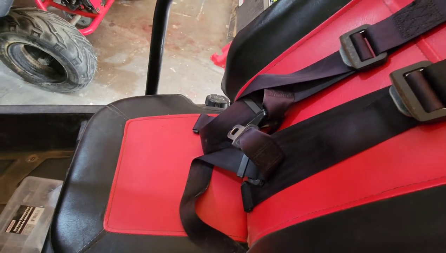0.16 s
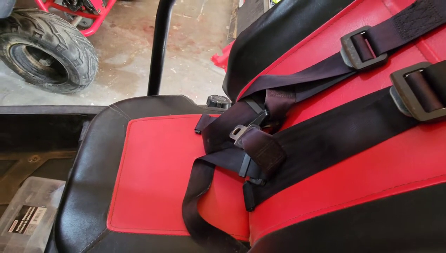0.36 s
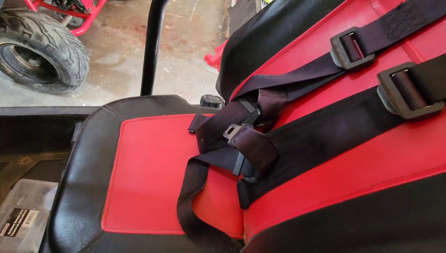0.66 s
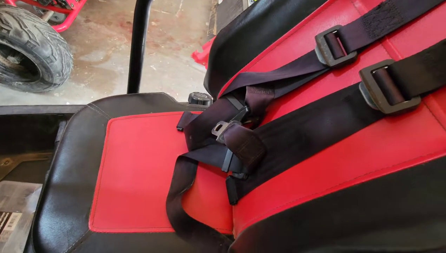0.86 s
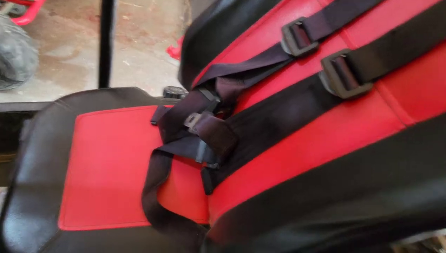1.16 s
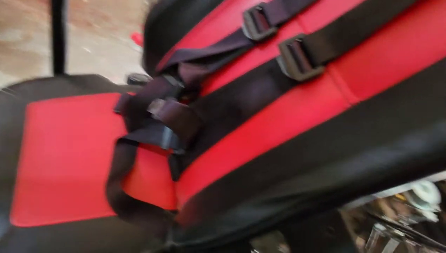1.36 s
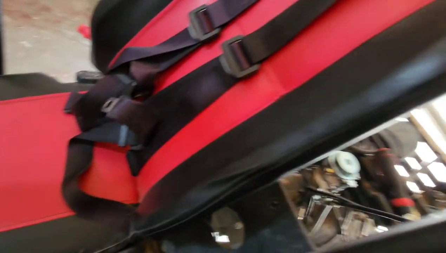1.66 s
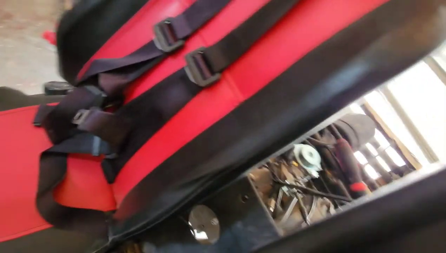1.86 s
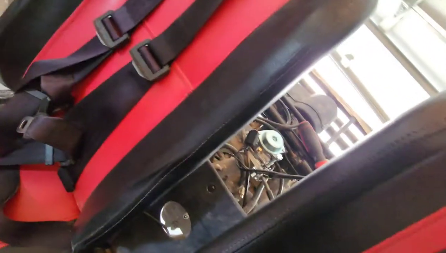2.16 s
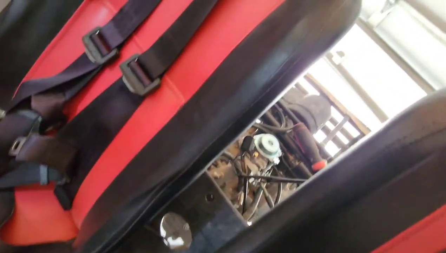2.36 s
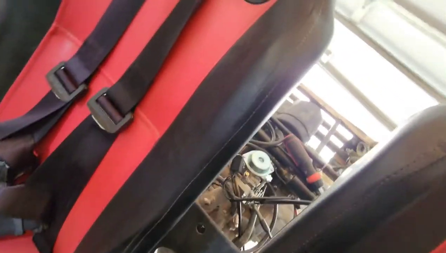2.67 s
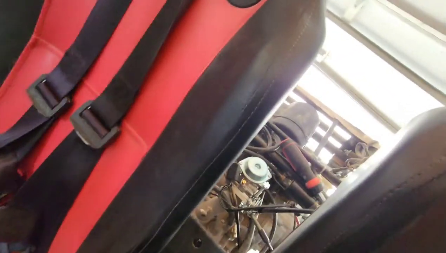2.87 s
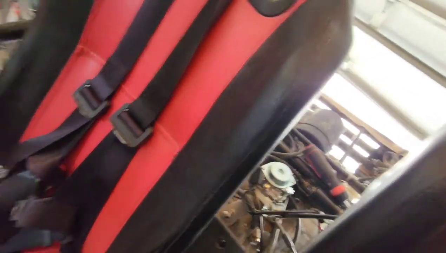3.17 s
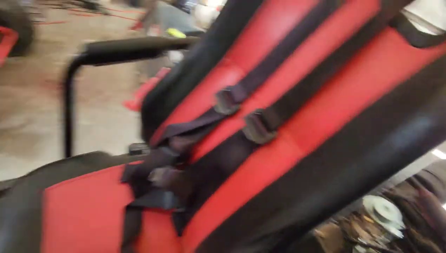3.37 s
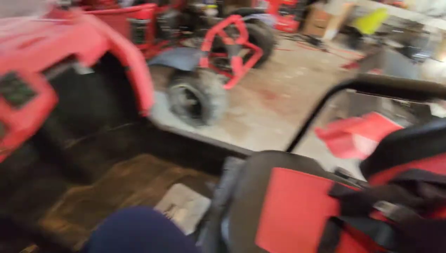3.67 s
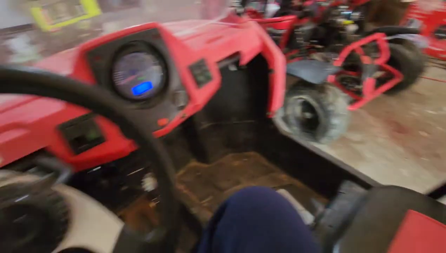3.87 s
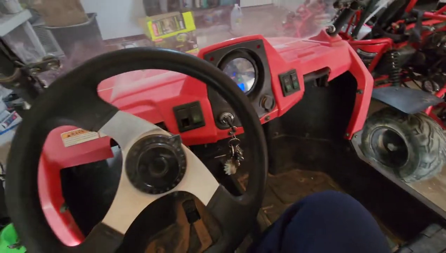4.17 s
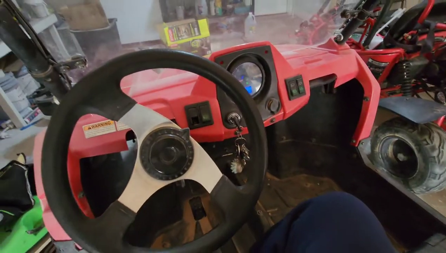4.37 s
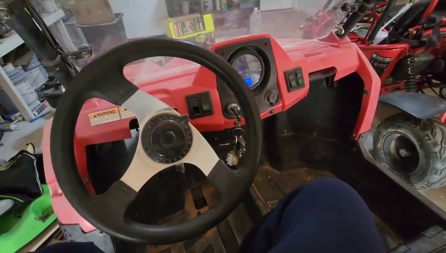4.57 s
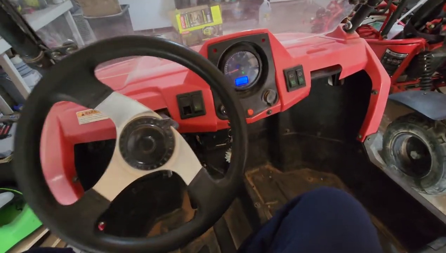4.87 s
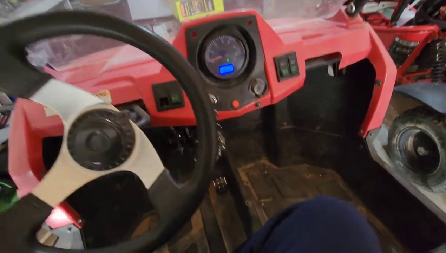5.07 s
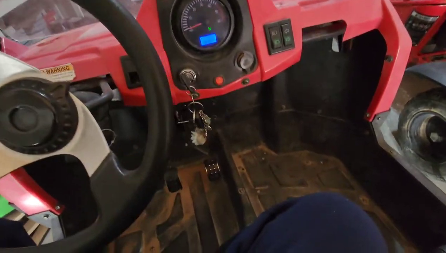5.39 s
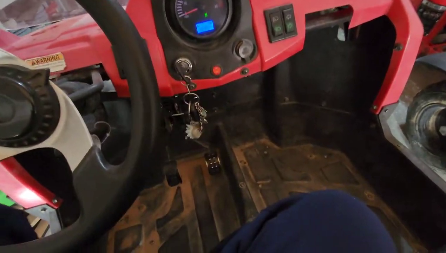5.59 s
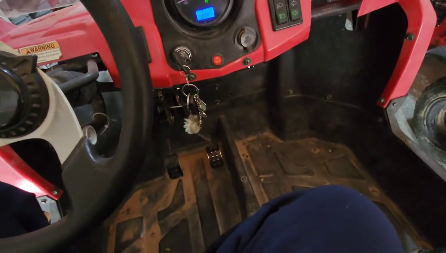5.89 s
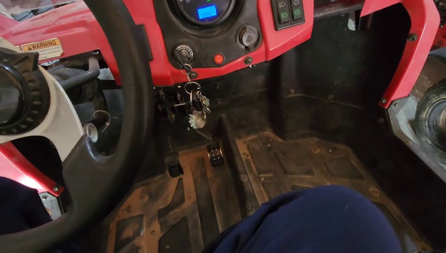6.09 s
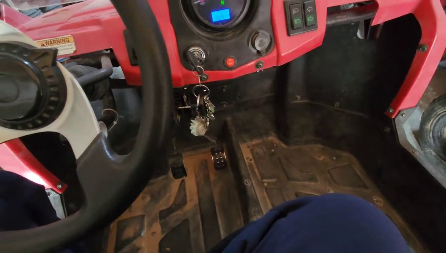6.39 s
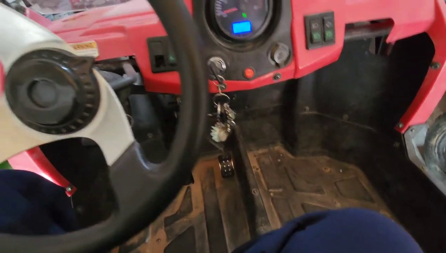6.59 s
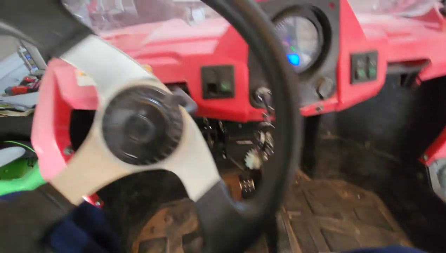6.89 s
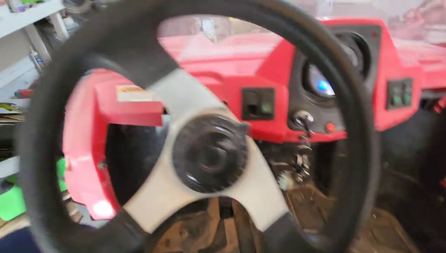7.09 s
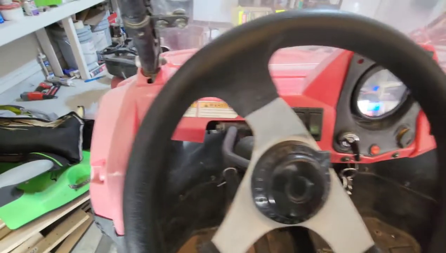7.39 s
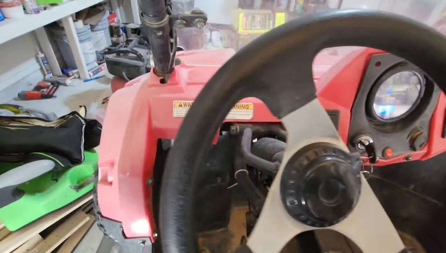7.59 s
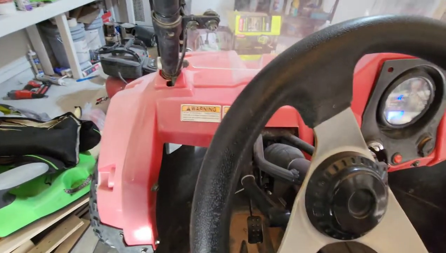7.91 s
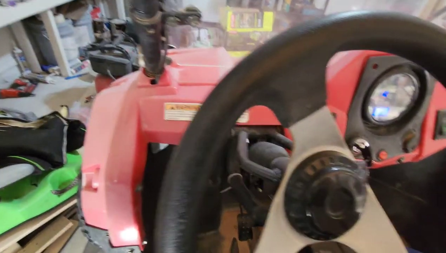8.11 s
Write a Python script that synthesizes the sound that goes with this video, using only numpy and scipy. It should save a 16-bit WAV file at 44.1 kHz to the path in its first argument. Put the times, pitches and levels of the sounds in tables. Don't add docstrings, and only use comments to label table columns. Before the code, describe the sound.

From the seat of an open buggy in a garage, a handheld stereo microphone hears its engine droning steadily. The deep pulsing exhaust dominates; a belt-driven shaft adds a slight beating and thin fan whine, while valves tick and cooling air hisses through ringing metal covers. Facing the gap by the engine brings more mechanical detail; swinging towards the steering wheel recolours the drone, which continues unchanged in speed to the end.

```python
import sys
import numpy as np
from scipy import signal
from scipy.fft import rfft, irfft
from scipy.io import wavfile
from scipy.ndimage import uniform_filter1d

SR = 44100
rng = np.random.default_rng(int(sys.argv[2]) if len(sys.argv) > 2 else 0)


def materialize(psi):
    bounded = np.clip(np.atleast_2d(psi).T, -1, 1)
    quanta = np.round(bounded * 32767).astype(np.int16)
    wavfile.write(sys.argv[1], SR, quanta)


def natural_amplitude(level_db):
    exponent = np.asarray(level_db, float) / 20
    return 10 ** exponent


N = 363825
STEP = 128


def evened(x):
    return x / np.sqrt(np.mean(abs(x) ** 2) + 1e-20)


def read(points, hz, outside=None):
    f, value = np.transpose(points)
    return np.interp(np.log(hz + 1), np.log(f + 1), value, outside, outside)


def curve(rows, column, t):
    rows = np.array(rows)
    return np.interp(t, rows[:, 0], rows[:, column])


def wander(per_s, count):
    raw = rng.standard_normal((count, N // STEP + 2))
    f = np.fft.rfftfreq(raw.shape[1], STEP / SR)
    return evened(irfft(rfft(raw) / (1 + (f / per_s) ** 2), raw.shape[1]))


def widen(coarse):
    return np.interp(np.arange(N) / STEP, np.arange(len(coarse)), coarse)


def coarse_time():
    return np.arange(N // STEP + 2) * STEP / SR


def step(t, at_s, length_s):
    return 0.5 + 0.5 * np.tanh(2 * (t - at_s) / length_s)


def bump(t, at_s, length_s):
    return np.exp(-(2 * (t - at_s) / length_s) ** 2)


OPENS_S, OPENING_S, TURNS_S, TURNING_S = 1.82, 0.83, 3.76, 0.63
SHADE_S, SHADE_LENGTH_S, SHADE_DB = 4.08, 1, -1.5


def facing(t):
    away = step(t, TURNS_S, TURNING_S)
    view = step(t, OPENS_S, OPENING_S) * (1 - away)
    return view, away, SHADE_DB * bump(t, SHADE_S, SHADE_LENGTH_S)


# (frequency [Hz], correlation [-1 to 1])
LIKENESS = [(60, 0.93), (200, 1), (380, 0.92), (700, 0.6), (1290, 0.34), (2400, 0.093), (4400, 0.07),
            (7000, 0.08), (15000, 0.065)]


def noise(db, size, patchy_db=1.5, span_hz=400, span_s=0.055, lag_s=0):
    hop, hz = size // 4, np.fft.rfftfreq(size, 1 / SR)
    a, b, c, d, patches = rng.standard_normal((N // hop + 5, len(hz), 5)).T
    patches = uniform_filter1d(patches, max(int(span_hz * size / SR), 1), 0)
    patches = evened(uniform_filter1d(patches, max(int(span_s * SR / hop), 1), 1))
    same = np.clip(read(LIKENESS, hz), -1, 1)[:, None]
    left = a + 1j * b
    shared = same * left * np.exp(2j * np.pi * lag_s * hz)[:, None]
    z = np.array([left, shared + np.sqrt(1 - same ** 2) * (c + 1j * d)])
    z *= natural_amplitude(db(hz)[:, None] + patchy_db * patches)
    return evened(signal.istft(z, nperseg=size, noverlap=size - hop)[1][:, :N])


def partial(angle, db, per_s=2, depth=0.5):
    a, b, c, d = wander(per_s, count=4)
    wave = np.exp(1j * (angle + 2 * np.pi * rng.random()))
    left = widen(natural_amplitude(db) * np.exp(depth * (a + 1j * b))) * wave
    right = widen(natural_amplitude(db) * np.exp(depth * (a + c + 1j * (b + d)))) * wave
    return np.sqrt(2) * np.array([left.real, right.real])


# (frequency [Hz], width [Hz], level [dB])
TINWARE = [(4510, 150, -8.5), (5520, 57, -2.5), (6600, 84, -5), (7204, 69, 2), (8740, 700, -6),
           (10150, 230, -3), (12100, 230, -10), (12100, 160, -2), (14000, 96, -2), (14000, 180, -7)]


def tin_db(hz):
    lift = sum(natural_amplitude(db) ** 2 / (1 + (2 * (hz - f) / width) ** 2) for f, width, db in TINWARE)
    return 10 * np.log10(1 + 6.4 * lift)


# (frequency [Hz], level [dB])
AIR_COLOUR = [(8000, -16), (10500, 0.5), (11000, -1.5), (12300, -3.5), (13100, -6.5), (14800, 0.5),
              (16500, -6.5)]
AIR_DB, VIEW_AIR_DB, AWAY_AIR_DB = -35, 0.5, -0.5


def cooling_air(beat, tick, flutter):
    view, away, shade_db = facing(np.arange(N) / SR)
    air = noise(lambda hz: read(AIR_COLOUR, hz, -43) + tin_db(hz), size=512, patchy_db=1.0)
    air *= 1 + 0.12 * beat + 0.2 * (1 - away) * tick
    return natural_amplitude(AIR_DB + VIEW_AIR_DB * view + AWAY_AIR_DB * away + shade_db + 0.52 * flutter) * air


# (frequency [Hz], level [dB])
HISS_COLOUR = [(1760, -28), (3000, -3), (5110, -3), (5580, -2), (7280, -3.5), (7900, -5.5), (8610, -2),
               (11000, -15.5), (14300, -25), (22000, -120)]
HISS_DB, VIEW_HISS_DB, AWAY_HISS_DB = -30.5, 0.3, 0.5


def tin_hiss(beat, tick, flutter, pan_db):
    view, away, shade_db = facing(np.arange(N) / SR)
    hiss = noise(lambda hz: read(HISS_COLOUR, hz, -42) + tin_db(hz), size=1024, patchy_db=0.84, lag_s=0.00016)
    hiss *= 1 + 0.06 * beat + 0.14 * (1 - away) * tick
    level_db = HISS_DB + VIEW_HISS_DB * view + AWAY_HISS_DB * away
    return natural_amplitude(level_db + 0.66 * shade_db + 0.3 * flutter + 0.88 * pan_db) * hiss


# (frequency [Hz], level [dB])
CLATTER_COLOUR = [(530, 0), (900, -11.5), (1170, -10.5), (1270, -3), (1420, -5.5), (2030, -4), (2370, -5),
                  (3280, -15), (3830, -16), (4500, -16), (5850, -45), (9900, -120)]
CLATTER_DB, VIEW_CLATTER_DB, AWAY_CLATTER_DB = -32, 3.5, 0.1
BURSTS_DB = 0.6


def valve_clatter(tick, flutter, pan_db):
    view, away, shade_db = facing(np.arange(N) / SR)
    clatter = noise(lambda hz: read(CLATTER_COLOUR, hz, -43.5), size=512, patchy_db=1.1, lag_s=0.00032)
    clatter *= 1 + 0.37 * (1 - 0.5 * away) * tick
    level_db = CLATTER_DB + (VIEW_CLATTER_DB + BURSTS_DB * flutter) * view + AWAY_CLATTER_DB * away
    return natural_amplitude(level_db + 0.61 * shade_db + pan_db) * clatter


PAN_DB, VIEW_PAN_DB, AWAY_PAN_DB = 2, 1, 0


def machinery(angle):
    view, away, _ = facing(np.arange(N) / SR)
    beat = np.cos((BELT_RATIO - 2) * angle)
    flutter = widen(wander(7.4, count=1)[0])
    tick = np.exp(2.0 * (np.cos(angle + 2.0) - 1))
    pan_db = (PAN_DB + VIEW_PAN_DB * view + AWAY_PAN_DB * away) * np.array([[0.5], [-0.5]])
    clatter = valve_clatter(tick, flutter, pan_db)
    return clatter + tin_hiss(beat, tick, flutter, pan_db) + cooling_air(beat, tick, flutter)


# (frequency [Hz], level [dB per Hz])
RUMBLE_COLOUR = [(20, -20), (55, -9), (80, -8), (135, 0.5), (200, -3), (250, -1), (340, -9), (460, -2),
                 (560, -10.5), (700, -6), (820, -3), (940, -12.5), (1200, -10)]
RUMBLE_DB = -33
RUMBLE_SHADE = 0.42


def rumble(angle):
    shade_db = facing(np.arange(N) / SR)[2]
    puffs = 1 + 0.44 * np.cos(angle + 0.52) + 0.26 * np.cos(2 * angle + 0.33)
    burns = noise(lambda hz: read(RUMBLE_COLOUR, hz, -68), size=2048, patchy_db=1.5, span_hz=80, span_s=0.18)
    return natural_amplitude(RUMBLE_DB + RUMBLE_SHADE * shade_db) * puffs * burns


BELT_RATIO = 2.342
BELT_BEATS = [(0, 1), (1, 1), (2, 1), (0, 2), (3, 1), (4, 1), (8, 1), (14, 1), (16, 1), (18, 1), (20, 1)]
BELT_LEVELS = [-37, -72, -64, -59, -71, -50.5, -56, -59, -50.5, -47.5, -61]
WHINE_DB, VIEW_WHINE_DB, AWAY_WHINE_DB = -51.5, 6, 1
# (time [s], length [s], level [dB])
WHINE_PEAKS = [
    (1.002, .3, 7),
    (1.85, 0.7, 2),
    (2.6, 0.88, 4.5),
    (3.49, 0.22, 5),
    (4.4, 0.74, 4),
    (5.1, 0.21, 10.5),
    (5.317, 0.3, 11),
    (5.704, 0.59, 6.5),
    (6.853, .4, 5),
    (7.7, .6, 6),
]


def belt(angle):
    beats = 0
    for (k, turns), db in zip(BELT_BEATS, BELT_LEVELS):
        beats = beats + partial((k + turns * BELT_RATIO) * angle, db, per_s=0.74, depth=0.045 + 0.0063 * k)
    t = coarse_time()
    view, away, _ = facing(t)
    swells_db = sum(db * bump(t, s, length_s) for s, length_s, db in WHINE_PEAKS)
    whine_db = WHINE_DB + VIEW_WHINE_DB * view + AWAY_WHINE_DB * away + swells_db
    return beats + partial(18 * BELT_RATIO * angle, whine_db, per_s=14, depth=0.17)


# (time [s], length [s], multiple [of firing
# rate], level [dB])
WAVE_CROSSINGS = [(0.15, 2.2, 10, -5.5), (0.6, 1, 11, -3), (0.75, 1.8, 20, -19), (2.1, 0.86, 8, 10),
                  (2.1, 1.1, 5, -3), (2.103, 1.4, 12, 10), (2.252, 1.86, 8, -15), (2.4, 1.9, 1, 5.5),
                  (2.4, 1.5, 9, -4.5), (3.447, 0.41, 5, -6.9), (3.45, 0.57, 15, 10), (3.6, 0.48, 4, -4),
                  (4.048, 0.66, 17, 10), (4.503, 1.02, 11, -15), (4.645, 0.7, 7, 9),
                  (4.65, 1.3, 14, -7.8), (4.804, 1.04, 3, -1.5), (5.1, 2.45, 6, 12.8),
                  (5.4, 3.4, 7, -4.5), (5.4, 2.33, 16, -16), (5.55, 1.006, 4, 3), (6.0, 0.79, 17, -16),
                  (6.15, 0.99, 9, 5.5), (6.3, 2.5, 18, -13), (6.613, 3, 8, -9), (7.05, 1, 8, 4),
                  (7.65, 3.35, 10, -11.5), (7.95, 0.76, 6, 9.5), (7.95, 1.54, 2, -2.0),
                  (8.25, 2.88, 5, 3.4),
                  (1.9, .5, 50, 9), (2.5, 1.48, 52, 5), (3.45, 0.4, 14, 5), (3.45, 0.34, 16, 1),
                   (2.95, 0.54, 4, 2.5), (7.1, 0.54, 14, 2), (4.4, 1.1, 15, -15), (4.5, 1.4, 22, 8.5),
                   (4.75, .6, 18, 2), (4.72, 0.22, 50, 8), (5.5, 0.77, 46, 2), (5.6, 1.6, 13, -12),
                   (5.7, 0.82, 21, 8), (7.6, 1.6, 20, -26), (7.8, 1.28, 49, 8), (7.9, 0.82, 50, 9)]


def crossings_db(multiple, t):
    total_db = 0 * t
    for s, length_s, k, db in WAVE_CROSSINGS:
        if round(k) == multiple:
            total_db = total_db + db * np.exp(-(2 * (t - s) / length_s) ** 4)
    return total_db


# (frequency [Hz], rms level [dB])
CASING_LINES = [(1050, -56), (1500, -55), (1900, -59.5), (2150, -56), (2300, -54.5), (2450, -53.5),
                (2600, -70), (2850, -49)]
VIEW_CASING_DB = 4


def casing(angle):
    t = coarse_time()
    multiples = list(range(23, 39)) + list(range(40, 62, 2)) + [45, 49]
    lines = 0
    for k in multiples:
        db = read(CASING_LINES, 47 * k) - 5 * (k % 2) + crossings_db(k, t)
        lines = lines + partial(k * angle, db, per_s=1.0, depth=0.28)
    return natural_amplitude(VIEW_CASING_DB * widen(facing(t)[0]) + 0.1) * lines


# (time [s], firing rate [Hz], exhaust level [dB])
ENGINE_RUN = [(0.0, 47.2, -14.5), (0.75, 47.58, -13.5), (1.25, 47.24, -14), (1.8, 46.88, -15),
              (2.25, 47.1, -15.5), (2.5, 46.7, -15), (3.0, 46.67, -15.5), (3.5, 47.3, -13.5),
              (3.85, 46.79, -13.5), (4.25, 46.4, -13.5), (4.48, 46.25, -14), (4.72, 46.6, -14),
              (5.6, 46.38, -14), (6.3, 46.82, -14), (6.55, 47.24, -14.5), (7.2, 47.47, -14),
              (7.7, 47.1, -14), (8.25, 47.4, -14.5)]


def firing_angle():
    uneven = 1 + 0.001175 * widen(wander(5.4, count=1)[0])
    hz = curve(ENGINE_RUN, 1, np.arange(N) / SR) * uneven
    return 2 * np.pi * np.cumsum(hz) / SR


SWING_S, SWINGING_S = 3.55, 0.26
SEATS_LEAD_RAD = 1.3
LATE_LEAD_RAD = 0.75
# (multiple [of firing rate], facing the seats [dB], facing the dash [dB])
EXHAUST_COLOUR = [(1, -23, -18.5), (2, -3, -1.5), (3, -6, -11), (4, -11.5, -12), (5, -10.5, -6),
                  (6, -17, -31), (7, -12.5, -26), (8, -16, -9), (9, -20.5, -20), (10, -12, -10.5),
                  (11, -19.5, -21), (12, -29.5, -23.5), (13, -31, -36.5), (14, -25, -25.5),
                  (15, -35.5, -33.5), (16, -29, -22.5), (17, -38, -30), (18, -27.5, -26.5),
                  (19, -38.5, -35.9), (20, -27, -34.5), (21, -44, -37.5), (22, -36.5, -37.5)]
# (frequency [Hz], rms level [dB])
EXHAUST_WIDTH = [(47, -55), (94, -45), (140, -41), (190, -42.5), (235, -36), (300, -46), (420, -38),
                 (600, -47), (1000, -51)]


def exhaust(angle):
    t = coarse_time()
    swung = step(t, SWING_S, SWINGING_S)
    _, seats_db, dash_db = np.transpose(EXHAUST_COLOUR)[:, :, None]
    db = seats_db + (dash_db - seats_db) * swung
    db = db + np.array([crossings_db(k + 1, t) for k in range(len(db))])
    db += curve(ENGINE_RUN, 2, t) - 10 * np.log10(np.sum(natural_amplitude(db) ** 2, axis=0))
    k = np.arange(1, len(db) + 1)[:, None]

    sway, rough, side_sway = [wander(per_s, count=2 * len(k)) for per_s in (2.3, 22, 0.48)]
    shake = 0.0075 * k * (sway[::2] + 1j * sway[1::2])
    shake = shake + 0.015 * np.sqrt(k) * (rough[::2] + 1j * rough[1::2])
    side_shake = 0.34 * side_sway[::2] + 0.6j * side_sway[1::2]
    ahead = rng.choice([-1j, 1j], (len(k), 1))

    lag = -4.7 * np.cumsum(1 / (1 + np.exp(2.6 * (3.95 - k))) + np.clip(k - 5, 0, 6) / 7, axis=0)
    lead = LATE_LEAD_RAD * np.maximum(k - 5, 0) + SEATS_LEAD_RAD * np.maximum(k - 2, 0) * (1 - swung)
    usual, seats, dash = rng.standard_normal((3, len(k), 1))
    scatter = 0.01264 * k ** 2 * (usual + 0.72 * (seats + (dash - seats) * swung))
    phase = lag + lead + scatter

    mid = natural_amplitude(db) * np.exp(1j * phase + shake)
    side = natural_amplitude(read(EXHAUST_WIDTH, 47 * k)) * ahead * np.exp(1j * phase + side_shake)
    turn, power, out = np.exp(1j * angle), 1, np.zeros((2, N))
    for m, s in zip(mid, side):
        power = power * turn
        out += np.sqrt(2) * np.array([(widen(m + s) * power).real, (widen(m - s) * power).real])
    return out


def scene():
    angle = firing_angle()
    background = machinery(angle) + rumble(angle)
    return background + belt(angle) + casing(angle) + exhaust(angle)


def joint_treble(x, mono_share=0.55, opposed_share=0.11):
    lead, first, width = 27, 352, 32
    window = signal.windows.kaiser_bessel_derived(2048, 4 * np.pi)
    padded = np.pad(x, ((0, 0), (lead, 0)))
    z = signal.stft(padded, window=window, nperseg=2048, noverlap=1024)[2]
    for low in range(first, first + 12 * width, width):
        left, right = z[:, low:low + width]
        power = np.sum(abs(left) ** 2 + abs(right) ** 2, axis=0) + 1e-20
        alike = uniform_filter1d(np.sum(left * right.conj(), axis=0).real / power, size=2)
        mono = alike > np.quantile(alike, 1 - np.clip(mono_share, 0, 1))
        opposed = alike < np.quantile(alike, np.clip(opposed_share, 0, 1))
        z[1, low:low + width] = np.where(mono, left, np.where(opposed, -left, right))
    return signal.istft(z, window=window, nperseg=2048, noverlap=1024)[1][:, lead:lead + N]


def roll_off(x):
    return signal.sosfilt(signal.butter(12, 15770, fs=SR, output="sos"), x)


def record(dry):
    mix = joint_treble(dry)
    return roll_off(mix)


dry = scene()
out = record(dry)
materialize(out)
```